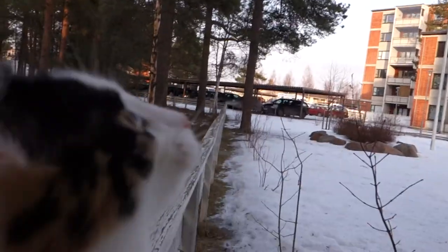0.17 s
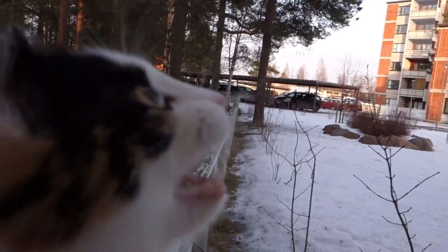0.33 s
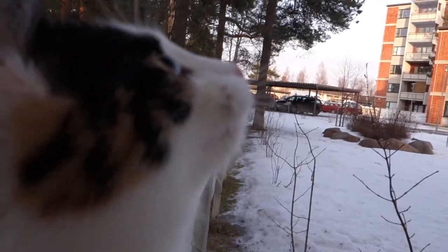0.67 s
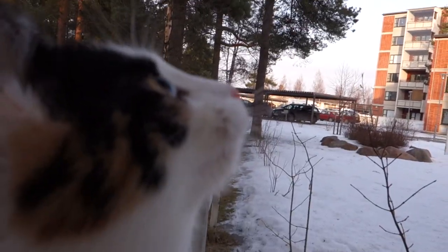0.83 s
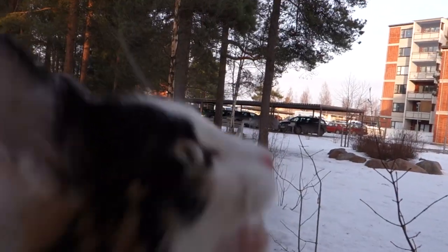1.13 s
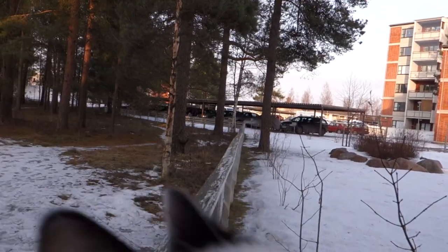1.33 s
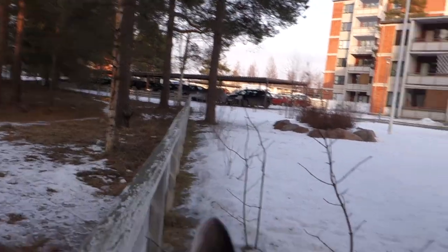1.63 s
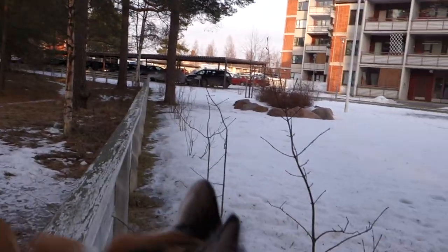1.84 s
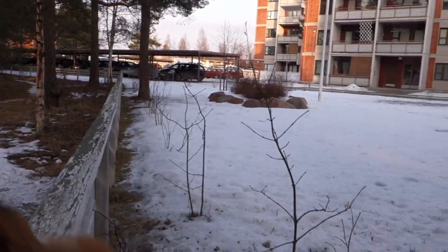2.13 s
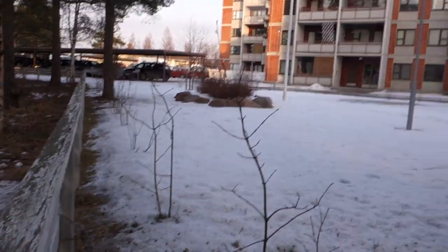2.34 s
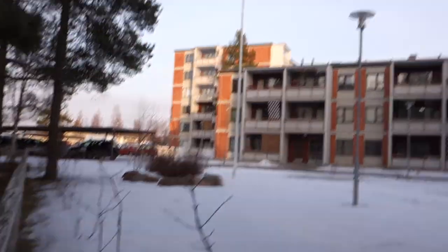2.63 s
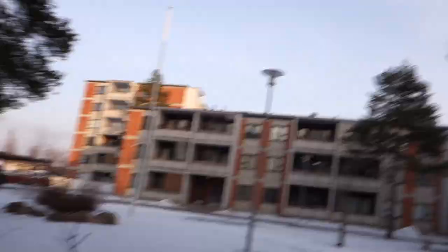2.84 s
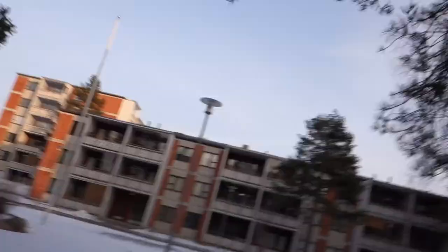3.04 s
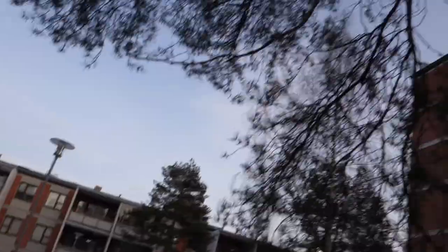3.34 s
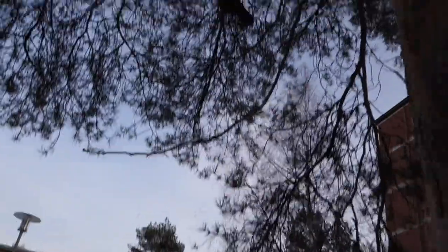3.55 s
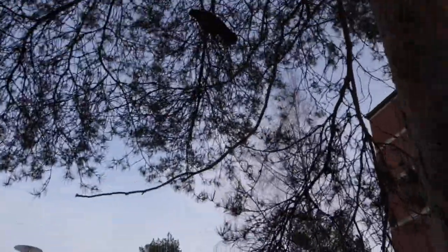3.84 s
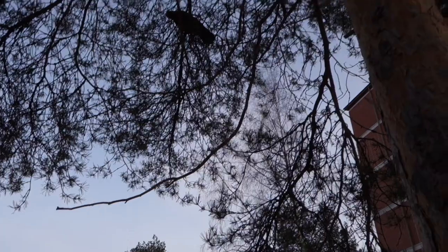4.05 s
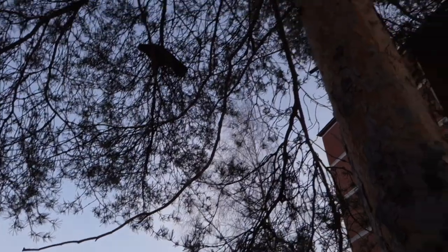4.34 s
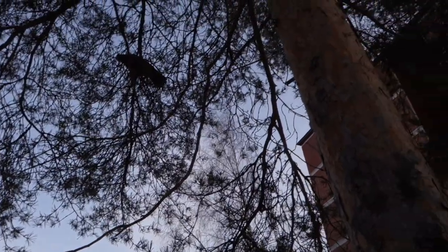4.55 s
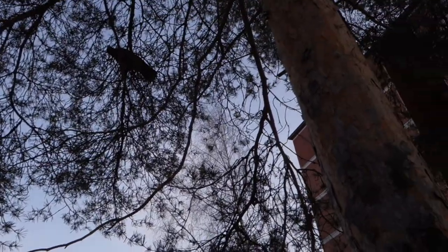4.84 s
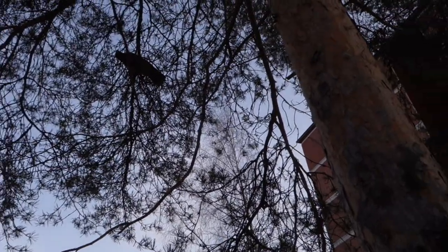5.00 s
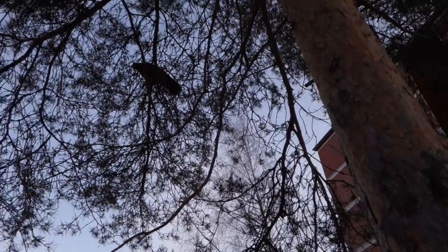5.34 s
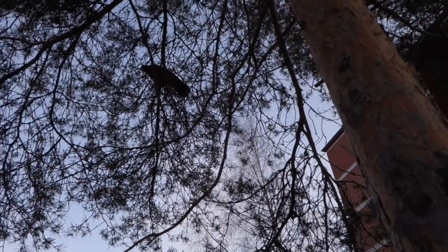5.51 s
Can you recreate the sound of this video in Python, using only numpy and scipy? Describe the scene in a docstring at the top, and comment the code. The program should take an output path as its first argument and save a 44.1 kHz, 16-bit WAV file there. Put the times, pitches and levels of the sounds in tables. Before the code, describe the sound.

Close, handheld stereo sound: a crow in a pine caws harshly, already mid-call at the start, then twice more, with echoes from the buildings. Between and around the caws a cat mews, chirps and smacks wetly. The camera is then handled, with rustling and knocks, and the rest is quiet distant traffic, a few tiny ticks and two faint, thin mews.

```python
"""The tail of a crow's caw comes first, over a traffic rumble; two full caws follow from the pine, each a
beating pulse train and gated noise through beak resonances, thrown back by buildings as sparse echoes.
A cat beside a handheld camera mews and chirps in gliding partials, later more faintly, and smacks its mouth
in noise bursts. Fur and cloth rustle in bands of noise; knocks ring the modes of the camera body.
Far traffic is shaped noise that changes colour as the camera turns; an engine hums on and off in two sines."""
import sys
import numpy as np
from scipy import signal
from scipy.fft import rfft, irfft, next_fast_len
from scipy.io import wavfile
from scipy.ndimage import uniform_filter1d

SR = 44100
rng = np.random.default_rng(int(sys.argv[2]) if len(sys.argv) > 2 else 0)


def natural_amplitude(level_db):
    """Convert a level in decibels to a linear amplitude factor, elementwise."""
    exponent = np.asarray(level_db, float) / 20
    return 10 ** exponent


def wav_record(signal):
    """Record a signal, one row per channel, as 16-bit PCM in the file named by sys.argv[1]."""
    frames = np.transpose(np.atleast_2d(signal))
    bounded = np.clip(frames, -1, 1)
    # unit amplitude maps onto the largest positive 16-bit level
    quanta = np.round(bounded * 32767).astype(np.int16)
    wavfile.write(sys.argv[1], SR, quanta)


N = 250047  # length [samples]

# one row a caw: (start [s], length [s], effort [dB], flutter depth [0-1],
# tilt above 3.5 kHz as the head turns [dB per octave])
CAWS = [(-.32, 0.46, -17.5, 0.14, 4.5), (.442, 0.48, -16, 0.85, 0), (1.79, 0.4573, -16, 0.94, 2.1)]
# controls of each caw: (time [s], pitch [Hz], flutter rate [Hz], beak opening [factor])
CAW_PITCH = [
    [(0, 251.6, 80, 0.93), (.06, 255.8, 85.3, 0.95), (.1, 253.1, 78, 0.96), (.14, 242.2, 70, 0.82)],
    [(.442, 236.5, 88.5, 0.84), (.47, 245.9, 87.5, 0.82), (.52, 274.8, 85.6, 0.91),
     (.555, 289.5, 77.8, 0.91), (.6, 304.4, 71.5, 1.08), (.645, 317.6, 75.06, 1.11),
     (.73, 318.9, 75.4, 1.08), (.775, 303, 72.7, 1.04), (.83, 301.1, 72.4, 1.035), (.87, 280.2, 71.2, 0.96),
     (.908, 239.1, 69.5, 0.84), (.927, 227, 69.2, 0.72)],
    [(1.79, 237.3, 85, .8), (1.82, 244.3, 84.6, 0.81), (1.866, 256.2, 85.4, 0.93), (1.9, 280.6, 86.3, 1.03),
     (1.95, 284, 85.9, 1.02), (2.03, 282.7, 75.86, 0.99), (2.11, 285.7, 72.6, 0.98),
     (2.16, 276.3, 69.3, .99), (2.2, 260.9, 64.6, 0.89), (2.235, 227.3, 62, 0.8)],
]
# resonances of the crow's windpipe and beak: (centre [Hz], width [Hz], level [dB])
BEAK = [(894, 580, -10), (1430, 316, 1), (1958, 1040, -5.5), (2912, 725, -7.5), (5996, 2240, -11.5),
        (7690, 4070, -18), (11700, 8100, -25.5)]
# crow at the two microphone ports: (frequency [Hz], left minus right [dB])
CROW_SIDE = [(380, -.5), (700, -2.5), (1290, -5.5), (2380, -3), (4400, -4), (8120, -4.5), (15000, 0)]
# phase by which the crow leads on the left: (frequency [Hz], lead [radians])
CROW_LEAD = [(500, 0), (1300, -.15), (2240, -.3), (3360, -1.7), (4480, -1.4), (6400, -2.4), (8400, -1.8),
             (11000, -2.8), (15000, -2.6)]
# reflections off trunk and snow: (delay [s], left share [factor], right share [factor])
NEAR_ECHO = [(.0021, 0.17, 0.19), (.0093, 0.13, 0.24), (.016, 0.15, -0.3)]
# decay of the yard's echo: (frequency [Hz], t60 [s])
ECHO = [(300, 0.172), (1500, 1), (3000, 0.61), (6000, 0.47), (12000, 0.32)]
# likeness of diffuse sound at the two ports: (frequency [Hz], likeness [-1 to 1])
SAME = [(60, 0.92), (130, 1), (290, 0.68), (640, 0.78), (1410, 0.38), (3100, -0.044), (6820, -0.35),
        (15000, 0.069)]
# colour of far traffic and air, before scaling to unit power: (frequency [Hz], density [dB per Hz])
YARD = [(15, -68), (25, -45), (53, -10.5), (75, -3.5), (93, -7), (110, -21.5), (156, -11.5), (199, -12.5),
        (267, -13.5), (457, -25), (552, -21), (1270, -20), (3180, -37.5), (4760, -49), (15500, -65)]
# colour added while facing the street, then the tree: (frequency [Hz], lift [dB])
FACING_STREET = [(80, 0.5), (150, 4.5), (400, 3), (1200, 4.5)]
FACING_TREE = [(80, 3.8), (150, 2.3), (400, 1.54), (1200, 2.8)]
# cars passing nearer: (time [s], lift before the share below [dB], half-width [s])
PASSING = [(2.9, 3.3, .4), (5.7, 2.9, 0.6)]
# how much of that lift each region gets: (frequency [Hz], share [factor])
PASSING_SHARE = [(60, 0.45), (250, 0.96), (1000, 0.66), (3000, .1)]
# engine speeding up: (time [s], firing rate [Hz])
ENGINE = [(0, 87.4), (.21, 101.6), (.52, 110), (1.22, 114.5), (1.5, 122), (2.2, 123.5), (2.65, 131)]
# stretches of engine hum: (start [s], length [s], firing tone rms [dB])
HUM = [(.17, .35, -47), (.86, .38, -41.5), (1.54, .16, -46), (2.18, .04, -44), (2.34, .15, -47)]
# wet smacks and dry ticks close by:
# (time [s], level [dB], brightness [dB per octave], t60 [s], left minus right [dB])
TICKS = [(0.2751, -35, -7, 0.046, 10), (0.4314, -17.5, -2.5, 0.0264, 2), (1.091, -36, -5, 0.014, -2.5),
         (1.1341, -26, -5, 0.03, 2.5), (1.3018, -17, -11, 0.0251, -3), (1.3044, -25, -5.5, 0.026, 11),
         (1.3134, -32, -9, 0.03, 4.5), (1.7829, -30.5, -21.5, 0.011, 4), (1.7964, -19.5, -7.5, 0.019, 4.5),
         (2.7164, -32, -10.5, 0.017, 16), (3.0008, -41, -0.5, 0.025, 14.5), (3.137, -30.5, -7, 0.01, 7.5),
         (3.3395, -39, -9, 0.03, 10), (3.3605, -37.5, -8, 0.036, 10), (3.5096, -38, -9.5, 0.03, 9),
         (4.4744, -47.5, -12.5, 0.033, -8)]
# one table a mew: (time [s], pitch [Hz], level before the mouth's colour [dB], mouth opening [factor])
MEWS = [
    [(.28, 368.8, -46, 0.12), (.33, 636, -37.5, 0.24), (.364, 540, -36.5, 0.15), (.39, 657, -38, 0.87),
     (.413, 625, -28, 0.54)],
    [(1.15, 507.6, -50, 0.8), (1.175, 519, -37, 0.71), (1.194, 552.3, -30, .85), (1.22, 528, -29.5, 0.83),
     (1.246, 504.5, -28.5, 0.75), (1.274, 591, -28, 0.84), (1.292, 570, -43, 0.49)],
    [(1.318, 673, -33, 0.95), (1.33, 680, -31.5, 1), (1.366, 765, -32.5, 1), (1.394, 842.5, -21, 0.99),
     (1.468, 831.4, -24.5, 0.95), (1.506, 860, -23.5, 1), (1.576, 808, -28, 0.95), (1.624, 813, -36.5, 0.9),
     (1.69, 826, -34.5, 0.94), (1.73, 808, -36, 0.84), (1.785, 745, -47, 0.86)],
    [(2.676, 768, -43, 1), (2.698, 757, -39, 0.83), (2.74, 758, -43.5, .87), (2.782, 746, -49, 1),
     (2.82, 770, -45.5, 0.96), (2.85, 767, -40.5, .8), (2.89, 747, -49, 0.74), (2.912, 760, -40.5, 0.73),
     (2.95, 885, -64, 0.74)],
    [(4.55, 774, -63, 0.68), (4.588, 830, -44, 0.92), (4.608, 836, -49, 0.92), (4.625, 842, -60, 0.64),
     (4.642, 834, -47, 0.93), (4.67, 835, -49.5, 1.05), (4.71, 815, -39, 0.77), (4.744, 760, -48.5, 0.91),
     (4.792, 768, -43.5, 1.11), (4.86, 748, -59, 0.98), (4.94, 728, -70, 1.12)],
    [(5.28, 554, -63, .9), (5.312, 589, -52.5, 0.83), (5.35, 639, -57, 0.88), (5.386, 659, -54, .6),
     (5.432, 668.5, -47.5, 0.75), (5.554, 686, -44, 0.6), (5.586, 683, -41.5, 0.54),
     (5.626, 671, -40.5, 0.44), (5.67, 653, -39.5, 0.41)],
]
# how each mew arrives: (roughness [0-1], left minus right [dB], extra tilt above 3.5 kHz [dB per octave],
# throat resonance before sharpness [dB], sharpness of the mouth's colour [factor])
MEW_RASP = [(.22, 3, -4, -12.5, .95), (.19, 0.5, -10, -10.5, 1.1), (.03, -0.5, -3, -15.5, 1.027),
            (.05, 5.5, -30, -12, 1.7), (.06, -6, -6, -16.5, 1.2), (.06, -3, 2, -11.5, 1.25)]
# colour of the cat's mouth at opening 1 and sharpness 1: (frequency [Hz], level [dB])
CAT_MOUTH = [(700, -20), (1700, -17), (2500, -6), (3300, 1.3), (4200, -14), (5500, -21), (7500, -35),
             (9000, -48.5), (13000, -40), (15000, -79.5)]
# phase by which the cat leads on the left: (frequency [Hz], lead [radians])
CAT_LEAD = [(900, -2.5), (2600, 1), (5000, 0.5), (9000, 1.5), (15000, 7.5)]
# strokes of fur and cloth; slopes below the shortest one are held to it:
# (peak time [s], peak [dB], rise of 20 dB [s], fall of 20 dB [s], hiss against swish [dB])
RUSTLE = [(0.442, -41.5, 0.1, 0.58, 1), (2.299, -63, 0.5, 0.57, 9.5), (2.479, -52, 1.3, 0.1, -3),
          (2.666, -55, -0.1, 0.24, 5), (2.829, -32, 0.09, 0.0523, -1.5), (2.99, -49.5, -0.46, 0.23, 1),
          (3.072, -45.5, 0.23, 0.06, -9.5), (3.2, -44.5, 0.14, 0.08, -2.5), (3.345, -55, 0.25, .06, -6),
          (3.4, -50, 0.14, 0.06, -11), (3.504, -47.5, -0.05, -0.25, -8), (3.53, -63, -1.8, 0.54, -5)]
# rough noise near 3 kHz, rubs at first; the last two rows are faint noisy onsets of mews:
# (peak time [s], peak [dB], rise of 20 dB [s], fall of 20 dB [s])
ROUGH_SWELLS = [(3.07, -55, .03, .3), (3.225, -57, .1, .02), (3.342, -48, .02, .12),
                (3.42, -45.5, .16, .018), (3.505, -47, .07, .015), (4.48, -61, .04, .1),
                (5.278, -56, .03, .05)]
# relative colours of the two bands of cloth and of the rough noise: (frequency [Hz], level [dB])
HISS = [(5000, -43), (8000, -2.5), (12500, 3), (15500, -18.5)]
SWISH = [(2500, -1), (4300, -3.5), (7000, -5), (11000, -22.5)]
ROUGH_BAND = [(1500, -29), (3100, 1.5), (4500, -21)]
# short chirps: (start [s], length [s], level before the mouth's colour [dB], pitch [Hz], left minus right [dB])
CHIRPS = [(2.414, 0.039, -38, 672.4, 1), (2.505, 0.066, -44, 715, -2), (2.592, 0.091, -40, 738, -4)]
# knocks on the camera body: (time [s], level [dB], pitch [factor], left minus right [dB])
KNOCKS = [(2.637, -31, 0.36, 10), (2.707, -26, 0.13, 9), (2.83, -18, 0.38, 13), (2.993, -24, 0.91, 2.5),
          (3.001, -7.5, 0.95, 6), (3.089, -28.5, 0.65, 8)]
# modes of the body, before the pitch factor: (frequency [Hz], relative level [dB], t60 [s])
BODY = [(510, 3.5, 0.013), (813, 8, 0.012), (1106, 8.5, 0.013), (1330, 2.5, 0.011), (1646, -1, 0.026),
        (2060, -5, 0.017), (2600, -12.5, 0.015), (2900, -43, 0.0069)]


def read(points, hz):
    """Reads a spectrum on a log-frequency axis."""
    f, value = np.transpose(points)
    return np.interp(np.log(hz + 1), np.log(f + 1), value)


def evened(x):
    """Scales to rms 1."""
    return x / np.sqrt(np.mean(x ** 2) + 1e-20)


def add(mix, s, sound):
    """Mixes a sound in at time s."""
    part = mix[..., round(s * SR):][..., :sound.shape[-1]]
    part += sound[..., :part.shape[-1]]


def panned(x, db):
    """Splits a level difference between left and right."""
    return np.array([x * natural_amplitude(db / 2), x * natural_amplitude(-db / 2)])


def wander(size, smooth):
    """Slow random drift of rms 1: noise averaged twice."""
    once = uniform_filter1d(rng.standard_normal(size), smooth)
    return evened(uniform_filter1d(once, smooth))


def resonate(x, hz, width):
    """Gliding resonance: shifts the curve hz down to zero, smooths twice, and shifts back."""
    turn = np.exp(2j * np.pi * np.cumsum(hz) / SR)
    r = np.exp(-np.pi * width / SR)
    smooth = signal.lfilter([(1 - r) ** 2], [1, -2 * r, r * r], x / turn)
    return 2 * (turn * smooth).real


def ports(pair, lead, side=((1, 0), (2, 0))):
    """The two microphone ports colour and delay a direction differently; the bass stays alike."""
    size = next_fast_len(N)
    hz = np.fft.rfftfreq(size, 1 / SR)
    sign = np.array([[.5], [-.5]]) * hz ** 2 / (hz ** 2 + 350 ** 2)
    response = natural_amplitude(sign * read(side, hz)) * np.exp(1j * sign * read(lead, hz))
    return irfft(rfft(pair, size) * response, size)[:, :N]


def diffuse(a, b, hz):
    """Second channel like the first in the bass, nearly unrelated in the high treble."""
    same = np.clip(read(SAME, hz), -1, 1)[:, None]
    return np.array([a, same * a + np.sqrt(1 - same ** 2) * b])


def noise(level, size, patchy_db):
    """Diffuse noise from random short-time spectra; level(s, Hz) gives the magnitude."""
    frames, hz = 4 * N // size + 5, np.fft.rfftfreq(size, 1 / SR)
    a, b, c, d, patches = rng.standard_normal((frames, len(hz), 5)).T
    patches = evened(uniform_filter1d(uniform_filter1d(patches, 8, 0), 8, 1))
    z = diffuse(a + 1j * b, c + 1j * d, hz) * natural_amplitude(patchy_db * patches)
    z = z * level(np.arange(frames) * size / 4 / SR, hz)
    return signal.istft(z, nperseg=size, noverlap=size * 3 // 4)[1][:, :N]


def swells(rows, t):
    """Power of a set of swells, each rising to its peak and falling at a steady dB rate; one row a swell."""
    s, db, rise, fall = (np.array(c)[:, None] for c in list(zip(*rows))[:4])
    shortest_s = .015
    before = (s - t) / np.maximum(rise, shortest_s)
    after = (t - s) / np.maximum(fall, shortest_s)
    return natural_amplitude(db - 20 * np.maximum(before, after)) ** 2


def caw(start, length, db, flutter_depth, treble_db, pitch):
    """Two membranes beat: each partial has a twin one flutter above, which wins higher up; gated noise adds rasp."""
    t = np.arange(max(start, 0), start + length, 1 / SR)
    s, *columns = np.transpose(pitch)
    hz, flutter_hz, beak = (np.interp(t, s, c) for c in columns)
    # effort jumps up, follows the pitch and breaks off
    attack_s, release_s = 0.041, .024
    sag = 1 - hz / hz.max()
    rising = np.maximum(1 - (t - start) / attack_s, 0)
    ending = np.maximum(1 - (start + length - t) / release_s, 0)
    effort_db = db - 9.5 * rising - 12.5 * sag - 18 * ending ** 2
    depth = flutter_depth * (1 - 0.37 * (rising + ending))  # shallower during attack and release
    rough = np.clip(0.31 + 1.7 * sag, 0, 1)  # rougher as the pitch sags

    flutter = 2 * np.pi * np.cumsum(flutter_hz * (1 + .12 * rough * wander(len(t), 300))) / SR
    angle = 2 * np.pi * np.cumsum(hz * (1 + 0.0478 * rough * wander(len(t), 120))) / SR
    angle = angle + 0.099 * depth * np.sin(flutter + 1.48)  # the flutter also bends the pitch a little
    pulses = .3 * np.cos(angle)
    for k in range(2, 45):
        twin = np.arctan((0.42 * k * depth) ** 2)  # share moved from the partial to its twin
        turn = k * angle + 0.0285 * k * k  # nearly in step: sharp pulses
        drift_db = 2.6 * min(k / 6, 1) ** 2 * wander(len(t), 900)  # the low partials hold steadier
        fade_db = .3 * max(k - 10, 0)  # higher partials give way to noise
        bursts = 1 + 0.36 * min(k / 16, 1) ** 2 * np.cos(flutter)  # treble bursts, one a flutter
        pair = np.cos(twin) * np.cos(turn) + np.sin(twin) * np.cos(turn + flutter + 1.377 * k)
        pulses = pulses + natural_amplitude(drift_db - fade_db) * bursts * pair

    cycle = angle / (2 * np.pi) % 1
    gate = (0.24 + np.exp(-cycle / 0.16)) * (1 + 0.31 * depth * np.cos(flutter))
    rasp = evened(gate * rng.standard_normal(len(t)))
    drive = (1 - rough) * evened(pulses) + rough * rasp
    voice = 0
    for k, (f, width, level_db) in enumerate(BEAK):
        centre = f * (beak if f < 2400 else np.ones_like(beak))  # the beak moves only the low resonances
        tilt_db = treble_db * max(np.log2(f / 3500), 0)
        voice = voice + (-1) ** k * natural_amplitude(level_db + tilt_db) * resonate(drive, centre, width)
    # too small a bird for bass
    voice = signal.sosfilt(signal.butter(4, 480, "high", fs=SR, output="sos"), voice)
    running_rms = np.sqrt(abs(uniform_filter1d(voice ** 2, 2000)) + 1e-12)
    return t[0], natural_amplitude(effort_db) * voice / running_rms


def under_tree(x):
    """The direct sound plus a few near reflections, unlike at the two ports."""
    out = np.array([x, x])
    for s, *shares in NEAR_ECHO:
        add(out, s, np.outer(shares, x))
    return out


def buildings(x, gap_s=0.027):
    """Sparse echoes of random sign, each band dying at its own speed."""
    taps = np.zeros((2, SR))
    at = np.arange(round(gap_s * SR), SR - 20, 20)
    at = at + rng.integers(0, 20, (2, len(at)))
    np.put_along_axis(taps, at, rng.choice([-1., 1.], at.shape), 1)
    hz, t, z = signal.stft(taps, SR, nperseg=256)
    decay = natural_amplitude(-60 * t / read(ECHO, hz)[:, None])
    tail = signal.istft(diffuse(*z, hz) * decay, SR, nperseg=256)[1]
    return signal.fftconvolve(x[None], tail / np.linalg.norm(tail[0]), axes=1)[:, :N]


def yard():
    """Far traffic and air as shaped noise, whose colour changes as the camera turns."""
    turn_s, turn_lasts_s, sway_db = 3.35, .15, 1.25

    def level(t, hz):
        """Steady spectrum, the turn from street to tree, passing cars and a slow sway."""
        turned = .5 + .5 * np.tanh((t - turn_s) / turn_lasts_s)
        facing_db = np.outer(read(FACING_STREET, hz), 1 - turned) + np.outer(read(FACING_TREE, hz), turned)
        passing_db = sum(db * np.exp(-((t - s) / lasts) ** 2) for s, db, lasts in PASSING)
        lift_db = facing_db + np.outer(read(PASSING_SHARE, hz), passing_db)
        shape = natural_amplitude(read(YARD, hz))
        shape = shape / np.linalg.norm(shape)
        return shape[:, None] * natural_amplitude(lift_db + sway_db * wander(len(t), 25))
    return 0.73 * natural_amplitude(-43) * noise(level, size=2048, patchy_db=1.0)


def engine():
    """A firing tone that climbs as the engine speeds up, and its half, coming and going."""
    t = np.arange(N) / SR
    angle = 2 * np.pi * np.cumsum(np.interp(t, *np.transpose(ENGINE))) / SR
    edge_s = .16  # time to fade 20 dB at both ends
    levels = []
    for s, length, db in HUM:
        outside_s = np.maximum(np.maximum(s - t, t - s - length), 0)
        levels.append(db - 20 * outside_s / edge_s)
    return np.sqrt(2) * natural_amplitude(np.max(levels, 0)) * (np.sin(angle) + .5 * np.sin(angle / 2))


def ticks():
    """Smacks and ticks as short tilted bursts of noise, partly alike on both sides."""
    t, hz = np.arange(2048) / SR, np.fft.rfftfreq(2048, 1 / SR)
    out = np.zeros((2, N))
    for (s, db, tilt, t60, pan_db), grit in zip(TICKS, rng.standard_normal((len(TICKS), 2, 2048))):
        envelope = natural_amplitude(-60 * t / max(t60, .002)) * (1 - np.exp(-t / 0.00447))
        burst = (grit[0] + .5 * grit) * envelope
        colour = natural_amplitude(tilt * np.log2(hz / 3000 + 0.147)) * hz ** 2 / (hz ** 2 + 500 ** 2)
        burst = irfft(rfft(burst) * colour)
        pan = natural_amplitude(np.array([[.5], [-.5]]) * pan_db)
        add(out, s, natural_amplitude(db) * burst / abs(burst).max() * pan)
    return out


def mew(rows, rasp, pan_db, tilt_db, throat_db, sharpness):
    """Clean partials; the mouth's colour slides up as it opens, while a throat resonance stays put."""
    s, *columns = np.transpose(rows)
    t = np.arange(s[0], s[-1], 1 / SR)
    hz, level_db, mouth = (np.interp(t, s, c) for c in columns)
    jitter = (0.0028 + 0.0545 * rasp) * wander(len(t), 90)
    angle = 2 * np.pi * np.cumsum(hz * (1 + jitter)) / SR
    number = np.arange(1, 18)[:, None]
    partial_hz = number * hz

    throat_hz, throat_width_hz = 3200, 500
    throat = natural_amplitude(throat_db) / (1 + (2 * (partial_hz - throat_hz) / throat_width_hz) ** 2)
    colour_db = 20 * np.log10(natural_amplitude(read(CAT_MOUTH, partial_hz / np.maximum(mouth, .1))) + throat)
    treble_db = tilt_db * np.maximum(np.log2(partial_hz / 3500), 0)
    shaped = natural_amplitude(level_db + sharpness * colour_db + treble_db)
    chest = natural_amplitude(level_db - 6.5) / number ** .6  # low partials that the mouth does not shape
    partial_db = 20 * np.log10(np.hypot(shaped, chest * (partial_hz < 2000)))

    voice = 0
    for k, db in enumerate(partial_db, 1):
        shimmer = 1 + (0.051 + rasp * min(k / 4, 1)) * wander(len(t), 60)  # more rasp in the upper partials
        voice = voice + shimmer * natural_amplitude(db) * np.cos(k * angle + .12 * k * k)
    # turbulence rings in the mouth and follows the fifth partial
    breath = evened(resonate(rng.standard_normal(len(t)), 2800 + 0 * t, 1102))
    voice = voice + .9 * rasp * natural_amplitude(partial_db[4]) * breath
    fades = signal.windows.tukey(len(t), 600 / len(t))
    return s[0], panned(np.sqrt(2) * voice * fades, pan_db)


def rustle_and_rough_noise():
    """Hiss and swish of fur and cloth swell with each stroke; rough noise near 3 kHz swells on its own."""
    bright = natural_amplitude(np.array(RUSTLE)[:, 4:])

    def level(t, hz):
        """Sums the three bands in power."""
        strokes, rough = swells(RUSTLE, t), swells(ROUGH_SWELLS, t)
        power = 0
        for shape, swell in ((HISS, strokes * bright), (SWISH, strokes / bright), (ROUGH_BAND, rough)):
            colour = natural_amplitude(read(shape, hz)) ** 2
            power = power + np.outer(colour / colour.sum(), swell.sum(0))
        return np.sqrt(power) * natural_amplitude(wander(len(t), 3))  # 1 dB of flicker
    return noise(level, size=256, patchy_db=2.5)


def chirp(start, length, db, hz, pan_db):
    """A very short mew: level arches, pitch rises slightly."""
    edge_db, glide, mouth = -10, .02, .85
    rows = []
    for u in (0, .5, 1):
        place = 2 * u - 1
        rows.append((start + u * length, hz * (1 + glide * place), db + edge_db * abs(place), mouth))
    return mew(rows, rasp=.12, pan_db=pan_db, tilt_db=-30, throat_db=-20, sharpness=1.8)


def knocks():
    """Each knock rings the modes of the body at its own pitch and rattles on three times."""
    out, t = np.zeros((2, N)), np.arange(4000) / SR
    for (s, db, pitch, pan_db), chance in zip(KNOCKS, rng.random((len(KNOCKS), len(BODY)))):
        ring = 0
        for (f, mode_db, t60), p in zip(BODY, chance):
            mode_hz = f * pitch * (0.936 + 0.12 * p)
            ring = ring + natural_amplitude(mode_db - 60 * t / t60) * np.sin(2 * np.pi * mode_hz * t)
        ring = np.diff(ring * (1 - np.exp(-t / 0.00073)), prepend=0)  # a small body sends out little bass
        ring = panned(natural_amplitude(db) * ring / abs(ring).max(), pan_db)
        for delay_s, share in ((0, 0.21), (.0012, 0.79), (.0033, 0.32), (.0065, 0.3)):
            add(out, s + delay_s, share * ring)
    return out


def scene():
    """Crow above, cat near, the yard around."""
    crow, cat = np.zeros(N), np.zeros((2, N))
    for row, pitch in zip(CAWS, CAW_PITCH):
        add(crow, *caw(*row, pitch))
    for rows, rasp in zip(MEWS, MEW_RASP):
        add(cat, *mew(rows, *rasp))
    for row in CHIRPS:
        add(cat, *chirp(*row))
    # the first caw began before time 0: a stretch of the second stands in, so its echo is already building
    early = SR // 3
    crow_sent = np.r_[crow[SR // 2:][:early], crow[:-early]]
    cat_sent = np.r_[np.zeros(early), cat.mean(0)[:-early]]
    echo = buildings(crow_sent + .5 * cat_sent)
    echo = np.pad(echo[:, early:], ((0, 0), (0, early)))
    near = ports(under_tree(crow), CROW_LEAD, CROW_SIDE) + ports(cat, CAT_LEAD)
    around = natural_amplitude(-15.5) * echo + yard() + engine()
    return near + around + ticks() + rustle_and_rough_noise() + knocks()


def top_cut(x):
    """Nothing passes above the cut-off."""
    return signal.sosfilt(signal.butter(12, 15690, fs=SR, output="sos"), x)


def record(dry):
    """The close ports cancel left-right difference in the bass and cut the deepest rumble."""
    mid, side = (dry[0] + dry[1]) / 2, (dry[0] - dry[1]) / 2
    side = signal.sosfiltfilt(signal.butter(1, 450, "high", fs=SR, output="sos"), side)
    pair = np.array([mid + side, mid - side])
    heard = signal.sosfilt(signal.butter(2, 45, "high", fs=SR, output="sos"), pair)
    return top_cut(heard)


dry = scene()
out = record(dry)
wav_record(out)
```